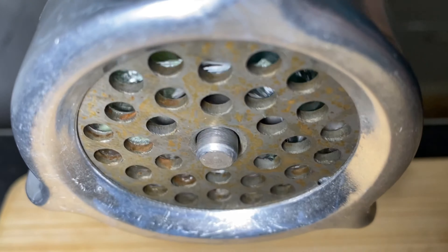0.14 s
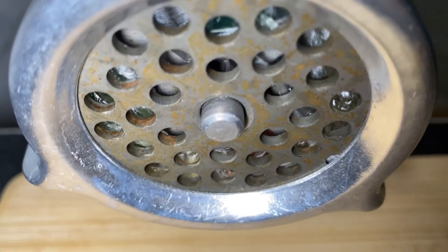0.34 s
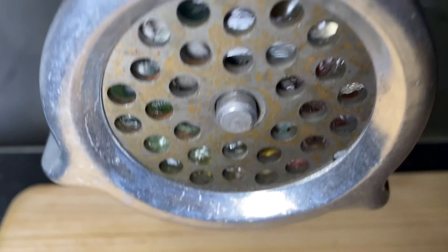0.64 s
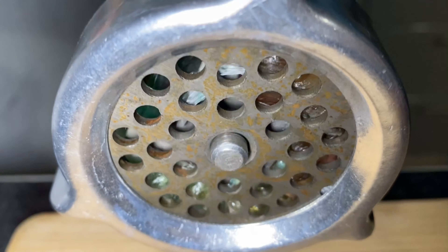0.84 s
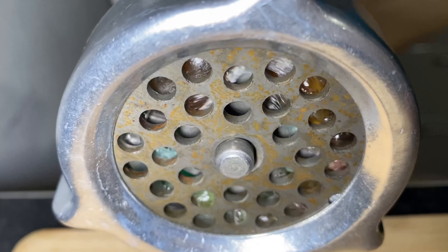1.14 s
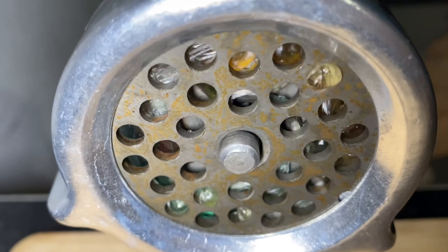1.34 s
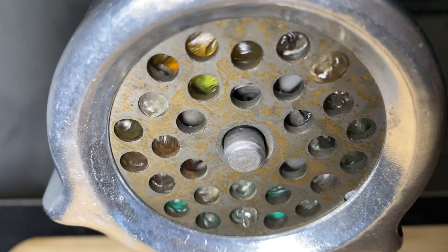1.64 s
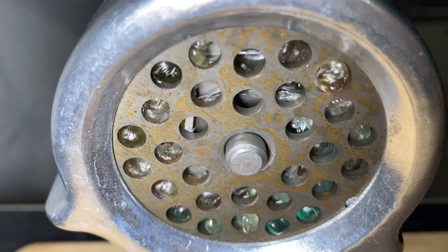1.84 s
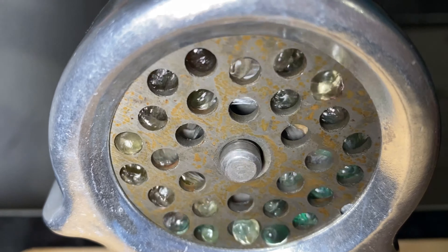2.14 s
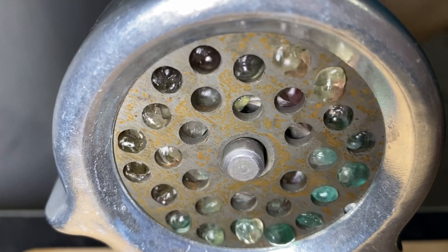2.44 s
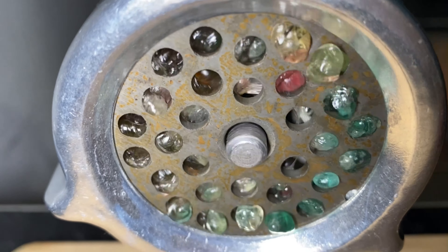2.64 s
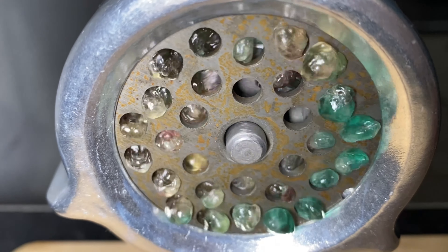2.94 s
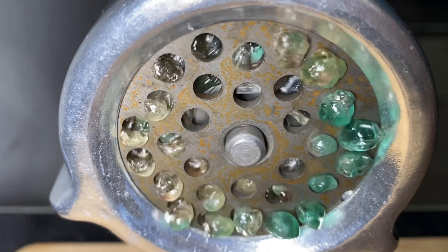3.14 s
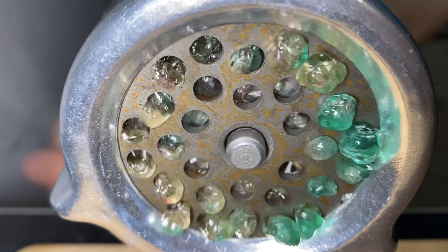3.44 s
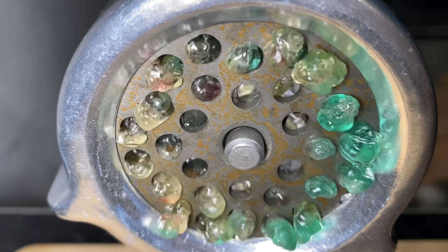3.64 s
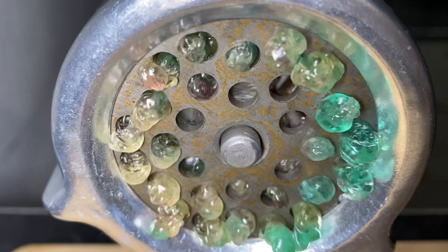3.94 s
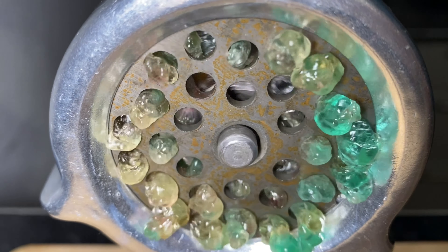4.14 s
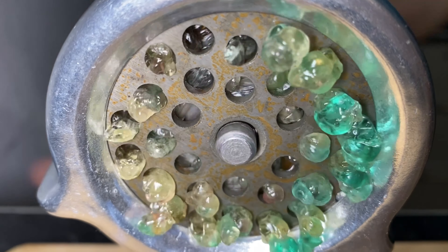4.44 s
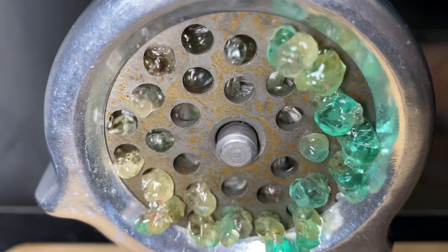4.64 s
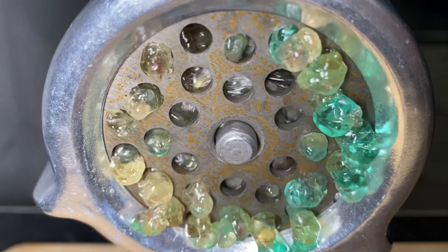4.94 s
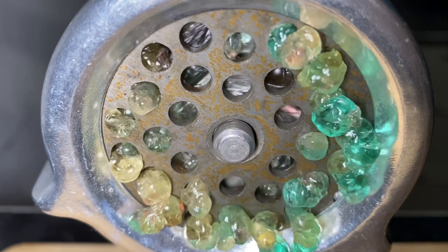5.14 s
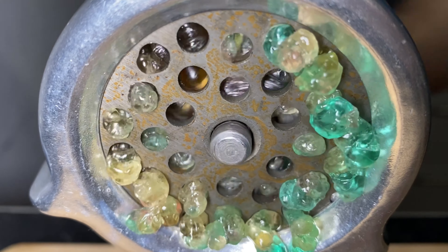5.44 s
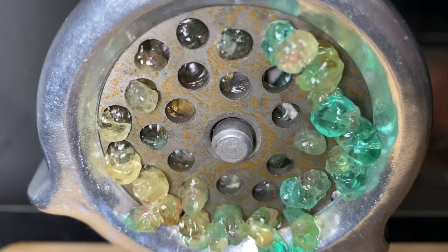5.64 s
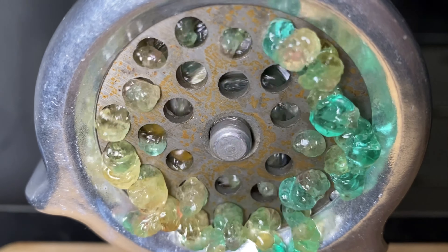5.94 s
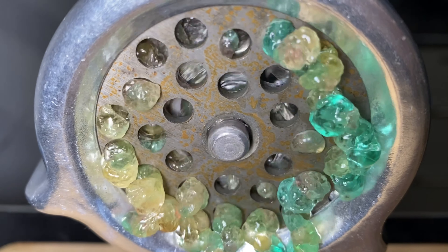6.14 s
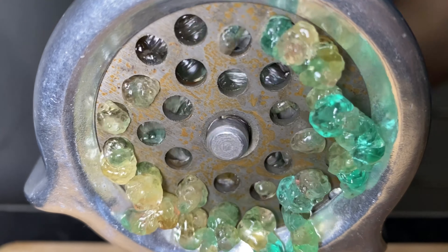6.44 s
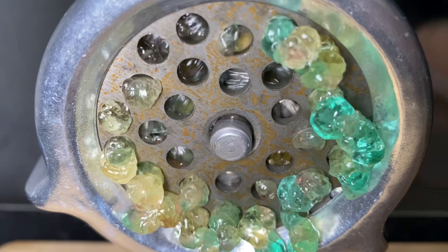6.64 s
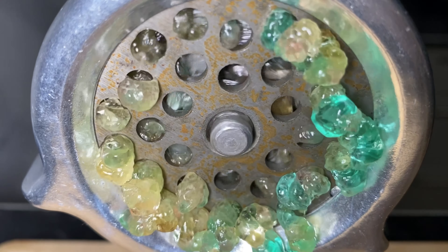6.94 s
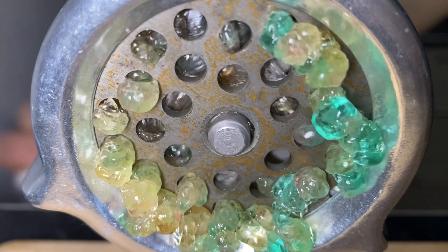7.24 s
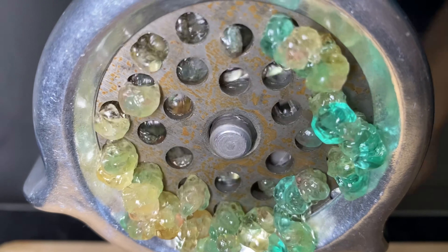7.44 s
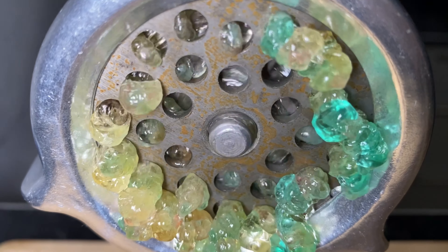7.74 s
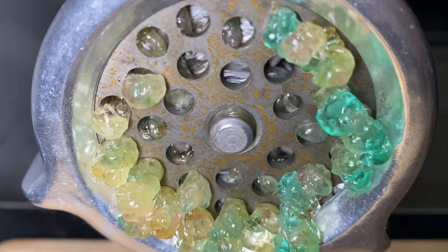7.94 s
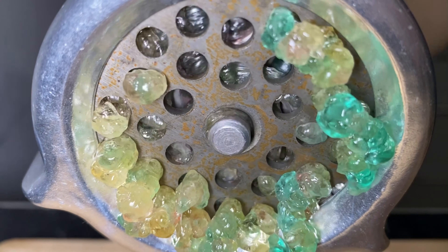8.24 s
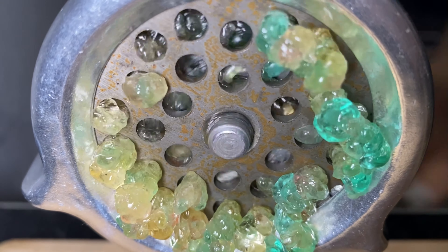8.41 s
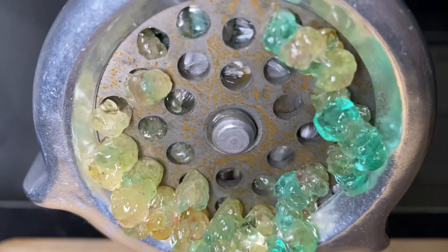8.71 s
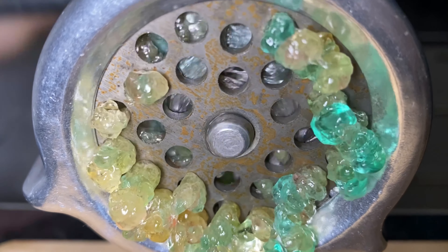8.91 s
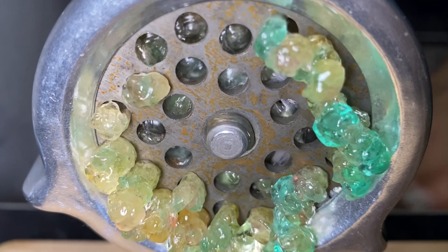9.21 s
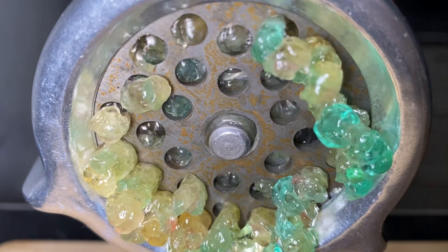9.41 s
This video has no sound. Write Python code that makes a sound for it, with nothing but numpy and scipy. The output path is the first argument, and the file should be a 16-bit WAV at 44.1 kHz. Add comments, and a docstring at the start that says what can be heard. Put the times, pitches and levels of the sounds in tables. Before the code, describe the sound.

An electric meat grinder runs for about ten seconds, heard close and fairly dry in a kitchen. Its low, wavering drone and rumble swell and ease roughly once a second as the screw pushes soft candy through the holed plate. Wet churning, sticky fizz and small irregular pops and ticks continue throughout. A short crunch comes at 1.4 seconds, and the drone swells around 2.4, with dull knocks. A loud pop at 3.2 is followed by sharp cracks with a brief metallic clink at 3.7 and 3.8. Crunching, knocks, faint squeaks and a stronger drone fill 4.1 to 4.7. More pops and a gritty rub come around 6.2 to 6.6, then loud snapping pops at 7.9 and 8.4. The sharpest crack hits at 9.2, briefly ringing the metal head, while the grinder keeps churning.

```python
"""Candy through a meat grinder

An electric grinder in a kitchen, close to a two-port microphone, presses soft candy through its plate.
Each push of the auger loads the body, which drones at one resonance over a rumble; the sticky mass
churns and fizzes. Air pockets pop in the holes, and now and then a hard piece cracks on the metal head."""
import sys
import numpy as np
from scipy import signal
from scipy.fft import rfft, irfft, next_fast_len
from scipy.io import wavfile

SR = 44100
rng = np.random.default_rng(int(sys.argv[2]) if len(sys.argv) > 2 else 0)


def put_to_file(sound):
    """Save the sound as 16-bit audio at rate SR, in the file named by the first command-line argument."""
    columns = np.atleast_2d(sound).T  # one column per channel
    safe = np.clip(columns, -1, 1)
    whole_steps = np.round(safe * 32767)
    wavfile.write(sys.argv[1], SR, whole_steps.astype(np.int16))


N = 422037

def from_db(db):
    return 10 ** (np.asarray(db) / 20)

def rms_one(x):
    return x / np.sqrt(np.mean(x ** 2) + 1e-20)

def energy_one(x):
    return x / np.sqrt(np.sum(x ** 2) + 1e-20)

def bins(size):
    return np.arange(size // 2 + 1) * SR / size

def at_hz(points, hz):
    """A curve read on a log-frequency axis."""
    f, value = np.transpose(points)
    return np.interp(np.log(np.maximum(hz, 1)), np.log(f), value)

def sides(pan_db):
    """Left and right gains, the left louder by pan_db."""
    return from_db([[pan_db / 2], [-pan_db / 2]])

def add(out, s, sound, pan_db):
    """Place a short sound at its time and side."""
    at = round(s * SR)
    sound = sound[:N - at]
    out[:, at:at + len(sound)] += rms_one(sides(pan_db)) * sound

def drift(hz):
    """A smooth random wander with spread 1."""
    step, settle = 40, 2000
    r = np.exp(-2 * np.pi * hz * step / SR)
    slow = signal.lfilter([1], [1, -2 * r, r * r], rng.standard_normal(N // step + settle + 2))[settle:]
    return np.interp(np.arange(N) / step, np.arange(len(slow)), rms_one(slow))

def swell(peak_s, length_s):
    """A rounded swell of height 1."""
    out, at, half = np.zeros(N + SR), round(peak_s * SR), int(length_s * SR / 2)
    span = np.arange(max(at - half, 0), at + half)
    out[span] = np.cos(np.pi / 2 * (span - at) / half) ** 2
    return out[:N]

def resonate(x, hz, width_hz):
    """Two passes through a two-pole resonance; rms 1."""
    r = np.exp(-np.pi * width_hz / SR)
    b, a = np.array([1, 0, -1]) * (1 - r * r) / 2, [1, -2 * r * np.cos(2 * np.pi * hz / SR), r * r]
    return rms_one(signal.lfilter(b, a, signal.lfilter(b, a, x)))

def band_noise(shape, hz, width_hz):
    return resonate(rng.standard_normal(shape), hz, width_hz)

def blip(hz, cycles):
    """A heavily damped ring that builds up and dies within a few cycles; energy 1."""
    t = np.arange(1024) / SR
    return energy_one(t ** 2 * np.exp(-t * hz / cycles) * np.sin(2 * np.pi * hz * t))

def impulse(spectrum, tilt_db=0, ripple_db=2, knee_hz=1500, size=1024):
    """The tightest causal click with this spectrum, tilted above the knee and randomly rippled."""
    hz = np.maximum(bins(size), 100)
    ripple = np.interp(hz, np.linspace(0, SR / 2, 60), rng.standard_normal(60))
    shape_db = at_hz(spectrum, hz) + tilt_db * np.log2(np.maximum(hz / knee_hz, 1)) + ripple_db * ripple
    cepstrum = irfft(np.log(from_db(shape_db)))
    causal = 2 * cepstrum * (np.arange(size) < size // 2)
    return energy_one(irfft(np.exp(rfft(causal))))

def smear(click, scatter, decay_s):
    """A break runs on as a swelling, then dying train of smaller breaks; the energy stays."""
    age = np.arange(len(click)) / (decay_s * SR)
    train = scatter * rng.standard_normal(len(click)) * age * np.exp(1 - age)
    train[0] = 1
    return energy_one(signal.fftconvolve(click, train)[:len(click)]) * np.sqrt(np.sum(click ** 2))

def grains(per_s, spread_db, smooth):
    """Two streams of tiny ruptures of uneven size over a smooth hiss."""
    sizes = from_db(spread_db * np.minimum(rng.exponential(1, (2, N)), 4)) * rng.choice([-1, 1], (2, N))
    return rms_one(sizes * (rng.random((2, N)) < per_s / SR)) + smooth * rng.standard_normal((2, N))

def plate(x, ring_db, ring_s):
    """Whatever rubs on the plate is coloured by its many narrow resonances."""
    t = np.arange(SR // 10) / SR
    response = from_db(ring_db) * energy_one(rng.standard_normal(len(t)) * np.exp(-t / ring_s))
    response[0] += 1
    return signal.fftconvolve(x, energy_one(response)[None], axes=1)[:, :N]

# Diffuse sound at the microphone. Each row: frequency in Hz, likeness of the two ports from 0 to 1.
PORT_LIKENESS = [(40, .92), (130, .75), (260, .75), (600, .4), (1000, .25), (2400, .2), (4500, .55),
                 (8000, .85), (16000, .8)]
def texture(source, spectrum, patchy_db, flutter_hz):
    """Two noises spread over both ports, in half-octave bands that flicker partly together."""
    size = next_fast_len(N, True)
    hz, (mid, side) = bins(size), rfft(source, size)
    alike = at_hz(PORT_LIKENESS, hz)
    pair = np.sqrt(1 + alike) * mid + np.sqrt(1 - alike) * side * [[1], [-1]]
    pair *= from_db(at_hz(spectrum, hz))
    half_octaves = 2 * np.log2(np.maximum(hz, 1) / spectrum[0][0])
    out, together = 0, drift(flutter_hz)
    for k in range(int(2 * np.log2(spectrum[-1][0] / spectrum[0][0])) + 2):
        band = irfft(pair * np.maximum(1 - abs(half_octaves - k), 0), size)[:, :N]
        out = out + band * from_db(patchy_db * (together + drift(flutter_hz)) / np.sqrt(2))
    return rms_one(out)

# Room tone in the kitchen. Each row: frequency in Hz, relative density in dB.
ROOM_TONE = [(30, -20), (44, 3.5), (70, -6), (110, -5.5), (180, -8.5), (400, -22)]
def room_tone(level_db=-58):
    """A steady deep background, heard between the pushes."""
    return from_db(level_db) * texture(rng.standard_normal((2, N)), ROOM_TONE, 2, flutter_hz=4.7)

# The motor, under the rumble. Each row: frequency in Hz, level in dB.
MOTOR = [(76, -63.5), (126, -66.5)]
def motor(waver_hz=1.34, flutter_db=1.5):
    """A low hum that wanders in pitch and level."""
    out = 0
    for hz, db in MOTOR:
        gain = np.sqrt(2) * from_db(db + flutter_db * drift(1.4))
        out = out + gain * np.sin(2 * np.pi * np.cumsum(hz + waver_hz * drift(2.9)) / SR)
    return out

# The auger's pushes. Each row: start and end in seconds, then the drive in dB of drone, rumble,
# housing, churn, fizz and grit. SLACK_DB holds the same six between pushes.
PUSHES = [(-0.12, 0.707, -37, -49.5, -57.5, -61, -65.5, -64),
          (0.62, 1.75, -41.5, -47, -55.5, -59.5, -67, -87),
          (1.681, 2.177, -42.5, -46.5, -56, -66, -65.5, -75),
          (2.106, 2.924, -42, -40, -50, -57.5, -61.5, -53.5),
          (2.857, 3.935, -40, -46.5, -51, -59.5, -69, -62.5),
          (3.947, 4.836, -43.5, -41.5, -46.5, -55.5, -64.5, -55),
          (4.815, 5.58, -39, -45, -48.5, -59, -63.5, -61.5),
          (5.499, 5.803, -41.5, -49, -60, -62.5, -80, -63.5),
          (5.855, 6.881, -38, -45, -48.5, -57.5, -63, -61), (6.768, 7.384, -36, -43, -48.5, -57, -63, -65),
          (7.383, 7.682, -37, -45, -47, -57.5, -66.5, -72),
          (7.647, 8.311, -37, -43.5, -49.5, -59.5, -64, -67),
          (8.283, 9.194, -39, -43, -49.5, -60, -64.5, -59.5),
          (9.071, 9.44, -44.5, -48, -53, -59, -58.5, -56), (9.51, 9.903, -30, -41, -61, -52.5, -68, -69.5)]
SLACK_DB = [-43.5, -53, -62.5, -68, -71, -66.5]
def pushes(rise_s=0.099, fall_s=0.2, arch=0.21):
    """Each push builds, arches and lets go; gives the six drives in dB."""
    t, slack = np.arange(N) / SR, np.array(SLACK_DB)[:, None]
    levels = slack + np.zeros(N)
    for start, end, *peak_db in PUSHES:
        on = (t > start) & (t < end)
        age, length = t[on] - start, end - start
        grip = np.clip(np.minimum(age / rise_s, (length - age) / fall_s), 0, 1)
        effort = grip * (1 - arch + arch * np.sin(np.pi * age / length))
        levels[:, on] = np.maximum(levels[:, on], slack + (np.array(peak_db)[:, None] - slack) * effort)
    return levels

# Swells of the beating drone. Each row: peak time and length in seconds, pitch in Hz, level in dB.
DRONE_SWELLS = [(0.285, 0.11, 256.3, -41.5), (0.525, 0.25, 259.5, -38.5), (0.693, 0.056, 250.1, -40),
                (0.783, 0.15, 257.8, -39.5), (0.895, 0.19, 258.7, -39.5), (1.162, 0.077, 250.1, -37.5),
                (1.289, 0.27, 256.1, -39), (1.495, 0.4, 259.1, -41.5), (1.869, 0.2, 257.0, -41.5),
                (2.113, 0.25, 259.0, -39), (2.284, 0.14, 252.1, -35.0), (2.375, 0.22, 258.2, -29),
                (2.474, 0.075, 256.3, -35.0), (2.6, 0.32, 256.9, -36.5), (2.75, 0.083, 256.2, -41.5),
                (2.986, 0.091, 253.8, -37.5), (3.047, 0.069, 258.9, -38), (3.145, 0.19, 260.0, -37.0),
                (3.271, 0.2, 258.0, -33), (3.421, 0.21, 257.9, -32.5), (3.624, 0.21, 254.5, -39.5),
                (3.754, 0.22, 257.3, -41.0), (4.113, 0.2, 257.4, -36), (4.323, 0.26, 259.6, -29.0),
                (4.458, 0.22, 256.6, -30.5), (4.577, 0.16, 255.6, -43), (5.105, 0.43, 256.5, -36),
                (5.379, 0.29, 257.4, -39), (6.006, 0.083, 251.1, -34.5), (6.118, 0.42, 255.2, -39.5),
                (6.364, 0.45, 259.7, -29.5), (6.7, 0.46, 258.2, -42.5), (6.949, 0.14, 253.1, -42.5),
                (7.146, 0.22, 258.2, -36), (7.648, 0.12, 257.3, -41), (7.775, 0.087, 254.4, -33.5),
                (7.882, 0.37, 254.7, -40), (8.01, 0.29, 256.1, -36.5), (8.1, 0.17, 256.9, -36.5),
                (8.595, 0.3, 258.7, -41.0), (8.752, 0.042, 248.7, -40), (8.85, 0.21, 256.0, -34.0),
                (9.175, 0.23, 256.4, -46), (9.342, 0.26, 257.1, -40)]
def drone(drive_db, rest_hz=262.2, waver_hz=2.15, throb_db=2.5, stutter_db=1.3, rough=0.22):
    """Friction keeps the body's main resonance swinging; it beats, swelling and wavering in pitch."""
    power = from_db(drive_db - 12 + throb_db * drift(7)) ** 2
    weighted_hz = rest_hz * power
    for s, length_s, hz, db in DRONE_SWELLS:
        swell_power = (from_db(db) * swell(s, length_s)) ** 2
        power, weighted_hz = power + swell_power, weighted_hz + hz * swell_power
    pitch_hz = weighted_hz / power + waver_hz * drift(9.3)
    tone = np.sqrt(2) * np.sin(2 * np.pi * np.cumsum(pitch_hz) / SR)
    friction = rough * band_noise((2, N), 257.7, width_hz=45)
    return from_db(stutter_db * drift(14.6)) * np.sqrt(power) * (tone * sides(-0.5) + friction)

# The grinder's body from close by. Each row: frequency in Hz, relative density in dB.
RUMBLE = [(25, -32.5), (33, -15), (42, -11), (75, -7), (95, -9), (125, 1.5), (150, -0.5), (185, -5.5),
          (225, 3.5), (300, -17), (450, -23.5)]
def rumble(level_db, thud):
    """The kneading screw shakes the body, harder at each knock."""
    noise = texture(rng.standard_normal((2, N)), RUMBLE, patchy_db=2, flutter_hz=22)
    return np.hypot(from_db(level_db), thud) * noise * sides(-1.6)

# The housing's weaker resonances. Each row: frequency and width in Hz, relative level in dB.
HOUSING = [(366.6, 6.9, -5), (446.2, 9.8, -9), (493, 26, -9.5), (616.3, 29.5, -3), (826, 17, -16),
           (886, 17, -9), (989, 13, -19.5), (1193, 52, -16.5)]
def housing(level_db, clunk):
    """Kneading and knocks stir the housing's resonances."""
    ring = 0
    for hz, width, db in HOUSING:
        gain = from_db(db + 1.9 * drift(18))
        centre, diffuse = band_noise(N, hz, 2 * width), band_noise((2, N), hz, 2 * width)
        ring = ring + gain * (centre + 0.75 * diffuse)
    return rms_one(ring) * np.hypot(from_db(level_db), clunk * from_db(1.5))

# The wet mass in the barrel. Each row: frequency in Hz, relative density in dB.
CHURN = [(250, 8.5), (400, 2.5), (620, 7.5), (1000, -4.5), (1350, 1.5), (2100, -3.5), (3200, -7.5),
         (5000, -24), (9000, -48)]
def churn(level_db):
    """The screw turns the wet mass over against the plate."""
    ruptures = plate(grains(per_s=260, spread_db=3, smooth=0.48), ring_db=0, ring_s=0.013)
    return from_db(level_db) * texture(ruptures, CHURN, patchy_db=2, flutter_hz=14.3)

# Rubbing at the plate. Each row: frequency in Hz, relative density in dB.
GRIT = [(1200, 4), (2000, 5.5), (2800, 0), (3600, -10.5), (4400, -4), (5500, -4.5), (7000, -15.5),
        (9000, -31.5)]
def grit(level_db, rub):
    """Candy rubs grittily on the plate."""
    ruptures = plate(grains(per_s=380, spread_db=3, smooth=0.64), ring_db=1.5, ring_s=0.0042)
    return np.hypot(from_db(level_db), rub) * texture(ruptures, GRIT, patchy_db=2.5, flutter_hz=29)

# Sticky fizz, close up. Each row: frequency in Hz, relative density in dB.
FIZZ = [(2500, -17), (4200, -11), (5800, -1.5), (7600, 1), (9500, -4), (12000, -8.5), (16000, -17)]
def fizz(level_db, sizzle):
    """Dense tiny ruptures in the sticky mass blend into a hiss."""
    ruptures = plate(grains(per_s=1200, spread_db=4, smooth=2.2), ring_db=-3.5, ring_s=0.0035)
    return np.hypot(from_db(level_db), sizzle) * texture(ruptures, FIZZ, patchy_db=2.5, flutter_hz=50)

def squelches(churn_db, per_s=40, centre_hz=1300, length_s=0.015):
    """Small slips inside the mass each ring one random pocket, as loud as the churning allows."""
    out = np.zeros((2, N))
    moments = np.flatnonzero(rng.random(N - 1) < per_s / SR)
    for at, (octaves, stretch, pan_db) in zip(moments, rng.normal(0, [.38, .35, 2], (len(moments), 3))):
        hz, size = centre_hz * 2 ** octaves, int(length_s * SR * np.exp(stretch))
        slip = band_noise(size, hz, 0.32 * hz) * np.sin(np.linspace(0, np.pi, size))
        add(out, at / SR, from_db(churn_db[at] + 1.5) * slip, pan_db)
    return out

# A thread or film of candy snapping. Each row: frequency in Hz, relative density in dB.
SNAP = [(500, -8.5), (1200, -30), (2500, 0.5), (3600, -7.5), (5500, -1), (8300, -11), (10500, -8.5),
        (12500, -33), (16000, -26)]
def crackle(drive_db, per_s=28, level_db=-37, spread_db=1.5, follow=0.61):
    """Sticky threads part at random with tiny ticks, louder as the drive rises."""
    out, swing_db = np.zeros((2, N)), follow * (drive_db - drive_db.mean())
    moments = np.flatnonzero(rng.random(N - 1) < per_s / SR)
    for at, weakness in zip(moments, np.minimum(rng.exponential(1, len(moments)), 2)):
        tick = impulse(SNAP, tilt_db=rng.normal(1, 1.5), ripple_db=5)
        add(out, at / SR, from_db(level_db - spread_db * weakness + swing_db[at]) * tick, pan_db=2)
    return out

# A pocket's spray and its puff of air. Each row: frequency in Hz, relative density in dB.
SPRAY = [(6000, -30), (10000, -12), (12000, -2), (14500, 0), (16000, -5), (18000, -18)]
PUFF = [(40, -30), (200, 1.5), (500, 11), (1000, 8), (2500, -20), (6000, -59), (16000, -58.5)]
def pop(hz, cavity_db, snap_hz, snap_db, spray_db):
    """A film of candy snaps, letting out spray and air; the pocket rings with a weak overtone."""
    cavity = blip(hz, cycles=1.1) + from_db(-17) * blip(hz * 1.395, cycles=2.2)
    ring = from_db(cavity_db) * cavity + from_db(snap_db - 4.5) * blip(snap_hz, cycles=0.97)
    # the harder the jet of spray, the more of the snap is a broad click
    click = from_db(min(snap_db - 4, spray_db + 6)) * impulse(SNAP)
    spray = from_db(spray_db) * impulse(SPRAY)
    puff = from_db(spray_db - 11) * impulse(PUFF, ripple_db=1)
    return ring + smear(click, scatter=1, decay_s=6e-5) + smear(spray, scatter=0.34, decay_s=1e-4) + puff

# Bursts at the plate, a little left of the microphone. Each row: start in seconds, cavity pitch in Hz, # cavity
# strength in dB, snap pitch in Hz, snap strength in dB, spray strength in dB. MORE_POCKETS holds # further
# bursts of the same kind, with the same columns.
AIR_POCKETS = [(0.12, 4500, -24, 1960, -22, -23.5), (0.7132, 2100, -9.5, 4430, -11, -35),
               (0.7416, 9200, -23.5, 6500, -24, -26), (1.0553, 10100, -13.5, 7300, -19.5, -22),
               (1.149, 10300, -25, 7300, -28, -28), (1.391, 9030, -30, 2770, -25, -27),
               (1.613, 7360, -23, 5150, -23, -26), (1.805, 2090, -10, 3220, -22.5, -29),
               (2.513, 6980, -19, 4690, -17, -29), (2.7851, 6820, -25, 4500, -25, -53),
               (2.8303, 7170, -15.5, 4300, -21, -28), (2.868, 4400, -27, 5800, -28, -37),
               (2.9534, 5130, -19.5, 3430, -16.5, -35), (2.99, 8750, -20, 5400, -31, -31),
               (3.02, 8250, -21, 5187, -21.5, -42), (3.1044, 8300, -18.5, 3000, -16.5, -30),
               (3.1146, 3470, -24, 4830, -21, -45), (3.1397, 2500, -30, 5480, -27, -36),
               (3.2255, 4380, 6, 3170, 2.5, -21), (3.2253, 5160, 2, 2300, -15, -32),
               (3.553, 6100, -10, 7740, -19, -35), (3.555, 6200, -18, 7000, -27, -38),
               (3.6137, 7100, -21, 9170, -20, -33), (3.694, 3200, -7.5, 1900, -10, -15),
               (3.9234, 1850, -30, 6930, -22, -28), (4.214, 2830, -24, 4940, -21, -29),
               (4.5476, 5250, -22.5, 3050, -22, -44), (4.915, 918, -25, 6900, -20, -7),
               (4.9906, 7400, -21.5, 9250, -20, -38), (5.3367, 9330, -30, 3760, -25.5, -20.5),
               (5.8417, 8970, -17.5, 5610, -19, -27), (5.859, 10100, -22, 7660, -22, -23),
               (6.091, 4900, -26.5, 2910, -22.5, -31), (6.2109, 6150, -5, 7700, -8, -16.5),
               (6.2972, 2030, -2.5, 2840, -14, -34.5), (6.3923, 7370, -18.5, 1987, -24, -29),
               (6.4288, 1900, -18.5, 3000, -18.5, -40), (6.49, 5600, -33, 10560, -16, -24),
               (6.6836, 8950, -20, 2780, -16, -21), (6.8011, 10370, -20, 7350, -24.5, -24),
               (6.8584, 2000, -18.5, 2068, -19, -48), (6.9866, 9700, -17, 7650, -16.5, -13),
               (7.11, 10600, -14, 7860, -19.5, -20), (7.3594, 6830, -19, 5140, -22.5, -18),
               (7.486, 2470, -30, 1380, -14, -44), (7.4971, 1920, -12, 2830, -43, -48),
               (7.636, 7470, -17, 2840, -36, -25), (7.6379, 7200, -23, 5600, -19, -27),
               (7.784, 1780, -13, 2880, -38, -48), (7.9392, 2710, 1, 6680, -1, -6),
               (8.1583, 8380, -21.5, 10100, -44.5, -28.5), (8.4378, 8580, -2.5, 2640, -7, -11),
               (8.4386, 4430, -1.5, 8840, 0.5, -1.5), (8.5805, 4440, -9, 7560, -8, -13.5),
               (8.7301, 1850, -21, 9000, -23, -30), (8.815, 3130, -21, 4550, -16.5, -26.5),
               (8.865, 3150, -20, 1800, -19, -32), (9.3072, 2872, -21, 5310, -20, -19),
               (9.393, 8340, -17, 5460, -19, -26.5)]
MORE_POCKETS = [(0.268, 9500, -38, 5200, -44, -38), (0.282, 10000, -38, 6000, -42, -33),
                (0.639, 10500, -38, 7000, -33, -40), (0.5382, 2400, -24, 6960, -34.5, -38),
                (1.003, 4300, -28.5, 7600, -40, -40), (1.8903, 7000, -24.5, 3700, -44, -25),
                (2.099, 2000, -22, 3020, -40, -50), (2.4995, 7520, -39, 4210, -32, -29),
                (2.587, 4340, -37, 6030, -35, -48), (2.599, 4300, -27.5, 5700, -29, -48),
                (2.623, 5070, -27, 4200, -28, -48), (2.7258, 8300, -28, 2920, -30, -41.5),
                (2.877, 3940, -31, 5900, -27, -40), (2.938, 2698, -22.5, 6900, -28, -33),
                (3.303, 7000, -30, 3500, -38, -37), (3.403, 2960, -32, 5860, -30, -47),
                (3.4207, 7300, -29, 2300, -22, -35), (3.6441, 4670, -17, 5500, -15, -40),
                (3.7754, 3080, -30, 5830, -27, -41), (3.8943, 5340, -24.5, 5000, -24, -54),
                (4.0096, 2940, -25.5, 2600, -36, -55), (4.055, 4630, -34, 6030, -24, -50),
                (4.0837, 2400, -21.5, 6890, -31, -54), (4.1782, 7800, -28, 3230, -30, -37),
                (4.6081, 3300, -28, 6700, -27.5, -45), (4.869, 3080, -27, 5440, -28, -46),
                (4.9112, 5960, -30, 3460, -21, -21), (4.959, 6700, -29.5, 3390, -32, -42),
                (5.365, 3300, -35.5, 5500, -37, -33), (5.399, 7930, -40.5, 4260, -29, -26),
                (5.8096, 6640, -31, 3280, -30, -39), (5.8235, 6920, -26.5, 4450, -29, -40),
                (5.9063, 4060, -25, 6300, -31, -41), (5.9135, 8050, -34, 1900, -28, -31),
                (6.2498, 5740, -21.5, 4600, -23, -49), (6.2782, 6000, -27, 3880, -23, -42),
                (6.5485, 7190, -29.5, 2200, -24, -35), (6.7494, 6370, -34.5, 4093, -37, -34),
                (6.9063, 7830, -36, 3390, -28.5, -23), (6.9701, 4070, -28.5, 6690, -37, -50),
                (7.154, 2900, -35.5, 3200, -40.5, -57.5), (7.7737, 5340, -25, 4765, -32, -53.5),
                (7.7955, 7450, -26.5, 1783, -29, -51), (7.9069, 6900, -27, 2090, -24.5, -31.5),
                (7.9576, 2908, -26.5, 5610, -29, -34), (8.0522, 7500, -22, 3540, -27.5, -38),
                (8.1732, 7610, -25, 3700, -41, -43), (8.2965, 10500, -40, 7000, -45, -27),
                (8.3604, 3400, -36, 5700, -25, -31), (8.5111, 3730, -30, 5670, -40, -50),
                (8.5635, 3980, -28, 5810, -42, -46), (8.7147, 5802, -21.5, 5014, -30, -33),
                (8.8384, 3500, -28, 7640, -24, -44), (8.9218, 2600, -36, 8700, -33, -29.5),
                (9.1532, 7900, -31, 4200, -40, -28.5), (9.3806, 7600, -33, 10500, -38, -38),
                (9.4174, 3057, -27, 7520, -35.5, -34.5), (9.488, 8120, -36.5, 4050, -31, -35)]
def pops():
    """Air pockets burst in the holes of the plate."""
    out = np.zeros((2, N))
    for s, *pocket in AIR_POCKETS + MORE_POCKETS:
        add(out, s, pop(*pocket), pan_db=3)
    return out

# Brittle lumps in the barrel, and splinters flying off the hard pieces that crack on the head. Each row: #
# start and decay in seconds, centre pitch in Hz, energy in dB.
CRUNCHES = [(0.225, 0.0051, 1500, -27), (0.388, 0.01, 880, -27), (0.714, 0.0014, 1630, -21),
            (1.403, 0.034, 980, -13.5), (1.488, 0.01, 1680, -27), (1.525, 0.015, 990, -25),
            (1.803, 0.005, 1310, -18), (2.44, 0.013, 1250, -23.5), (2.626, 0.0083, 2200, -23),
            (3.695, 0.002, 500, -15), (3.705, 0.0031, 1120, -9), (4.173, 0.01, 980, -19),
            (4.252, 0.022, 1190, -16), (4.4, 0.024, 1210, -13), (4.427, 0.012, 1100, -12.5),
            (4.628, 0.012, 940, -13.5), (4.685, 0.0043, 1370, -21.5), (5.066, 0.0022, 2090, -27),
            (5.646, 0.007, 1310, -29.5), (6.297, 0.0029, 1050, -10.5), (6.842, 0.0088, 1448, -20),
            (7.785, 0.0097, 1364, -18.5), (8.049, 0.0058, 765, -17), (8.1, 0.008, 1460, -24),
            (8.309, 0.0095, 3095, -34), (8.475, 0.0086, 1572, -17.5), (8.73, 0.019, 1380, -18),
            (8.868, 0.0099, 1930, -16.5), (8.945, 0.0068, 1720, -26), (9.2295, 0.0035, 6900, 0),
            (9.235, 0.03, 4300, -23)]
def crunches(breaks_per_s=1300, spread_octaves=0.49):
    """A lump or piece gives way and crumbles in a dying run of small breaks, each with its own pitch."""
    out = np.zeros((2, N))
    for s, decay_s, hz, energy_db in CRUNCHES:
        run, age_s = np.zeros((2, SR // 4)), 0
        for wait, octaves, size in rng.standard_normal((60, 3)):
            if age_s < 5 * decay_s:
                chip = blip(hz * 2 ** (spread_octaves * octaves), cycles=0.65)
                add(run, age_s, size * np.exp(-age_s / decay_s) * chip, pan_db=0)
            age_s += wait ** 2 / breaks_per_s
        add(out, s, from_db(energy_db) * energy_one(run[0]), pan_db=2)
    return out

# Candy dragging over the plate. Each row: start and length in seconds, pitch in Hz, level in dB.
RASPS = [(0.396, 0.3, 2780, -61.5), (0.42, 0.15, 1860, -55), (0.796, 0.47, 2780, -61),
         (1.231, 0.021, 1120, -49), (1.419, 0.099, 1300, -53), (1.724, 0.16, 1830, -51.5),
         (1.885, 0.33, 1840, -64), (2.272, 0.053, 1330, -47.5), (2.428, 0.04, 1290, -44),
         (2.616, 0.069, 2210, -50.5), (4.23, 0.077, 1400, -54), (4.388, 0.087, 1620, -51),
         (4.5, 0.07, 1800, -48.5), (6.226, 0.42, 1800, -53), (6.3, 0.22, 1200, -52),
         (6.557, 0.14, 1330, -49.5), (7.707, 0.12, 1710, -50.5), (8.018, 0.022, 1274, -51),
         (8.226, 0.083, 1500, -51), (8.528, 0.03, 1700, -48), (8.613, 0.067, 1560, -46),
         (9.203, 0.019, 5170, -39)]
def rasps(slips_per_s=600):
    """Sticky candy slips in quick uneven jerks, ringing the hole that it passes through."""
    out = np.zeros((2, N))
    for s, length_s, hz, db in RASPS:
        size = int(length_s * SR)
        slips = rng.standard_normal(size) * (0.36 + (rng.random(size) < slips_per_s / SR))
        rub = resonate(slips, hz, 0.34 * hz) * np.sin(np.linspace(0, np.pi, size))
        add(out, s, from_db(db) * rub, pan_db=-1)
    return out

# The screw loses its grip. Each row: centre and length in seconds, body and wet-sound change in dB.
LULLS = [(0.68, 0.22, -1, 3.5), (1.697, 0.14, -1, -1), (2.039, 0.14, -0.5, -7), (2.82, 0.16, -3.5, -3.5),
         (3.889, 0.2, -3, 1), (4.807, 0.21, -4, -8), (5.535, 0.69, 0, -3.5), (5.735, 0.11, -2, 2),
         (6.799, 0.17, -3, -2), (7.419, 0.081, -5, 5.5), (7.586, 0.077, -11.5, -0.5), (7.72, 0.038, -5, -1),
         (8.192, 0.08, -4, -5), (8.692, 0.086, -1, -1), (9.072, 0.08, -3.5, -1)]
def lulls():
    """Gains of the body and of the wet sounds while the screw runs slack."""
    return from_db(sum(np.array(db)[:, None] * swell(s, length_s) for s, length_s, *db in LULLS))

# The cast head with its plate, and the knife. Each row: frequency and width in Hz, relative level
# in dB, seconds to fall by 60 dB.
HEAD = [(438, 360, 4.5, 0.06), (1192, 97, 8, 0.24), (2100, 750, -11, 0.1), (2800, 270, -2, 0.36),
        (4460, 920, -0.5, 0.33), (5500, 830, -5, 0.24), (6700, 1450, 6, 0.21), (8400, 4640, 11.5, 0.12)]
KNIFE = [(1232, 79, 1, 0.049), (1900, 810, -8, 0.05), (2300, 250, -17, 0.045), (3120, 330, -6.5, 0.045),
         (4100, 320, -12, 0.059), (6170, 600, -8, 0.069), (6900, 530, -9.5, 0.059), (8500, 900, -25, 0.044)]
def metal_ring(modes, tilt_db=0, knee_hz=1192):
    """Crowded metal modes dying away; a dull blow stirs mainly the low ones."""
    t, out = np.arange(SR // 2) / SR, 0
    for hz, width, db, t60 in modes:
        start_db = db + tilt_db * max(np.log2(hz / knee_hz), 0)
        out = out + from_db(start_db - 60 * t / t60) * band_noise(len(t), hz, width)
    return out

# A hard piece shattering. Each row: frequency in Hz, relative density in dB.
SHATTER = [(100, -10.5), (400, -18), (650, -5.5), (1150, -1.5), (1700, -0.5), (2400, 6), (3500, -5.5),
           (5000, -3.5), (6600, 0), (8500, -2.5), (11000, -10.5), (16000, -15)]
# Breaks against the head. Each row: start in seconds, strength in dB, tilt in dB per octave, pitch of
# the piece in Hz, then head ring, knife ring and left minus right in dB.
CRACKS = [(0.714, -18.5, 3.5, 1990, -81, -45, 3), (3.6533, 4, -5, 2060, -41.5, -29, 3),
          (3.7904, 0, -10, 2320, -46, -31.5, 2), (7.487, -18.5, -15, 2550, -48.5, -53, 4),
          (8.3084, -7, -6.5, 1205, -45.5, -37.5, 3.5), (9.2171, 9, -1, 2190, -34.5, -38, 2),
          (9.2252, -1, 1.5, 8500, -58, -50, 2), (9.2296, -11, -2, 623, -44, -48, -6)]
def cracks(rebound_s=0.0051):
    """A hard piece shatters and sets the head ringing; the knife springs back with a clink."""
    out = np.zeros((2, N))
    for s, db, tilt_db, piece_hz, head_db, knife_db, pan_db in CRACKS:
        burst = smear(impulse(SHATTER, tilt_db, ripple_db=1), scatter=0.4, decay_s=0.0007)
        piece = from_db(-6) * blip(piece_hz, cycles=0.7)
        add(out, s, from_db(db) * (burst + piece), pan_db)
        add(out, s, from_db(head_db - 1) * metal_ring(HEAD, 0.91 * tilt_db), pan_db)
        add(out, s + rebound_s, from_db(knife_db) * metal_ring(KNIFE), pan_db)
    return out

# Escaping air. Each row: peak time and length in seconds, fizz and grit levels in dB.
SIZZLES = [(1.033, 0.44, -56, -58), (1.415, 0.29, -58.5, -62), (2.54, 0.26, -67, -60),
           (2.983, 0.25, -58, -59), (4.032, 0.11, -66, -49.5), (4.523, 0.09, -71.5, -57),
           (6.639, 0.093, -56, -60), (7.062, 0.17, -53.5, -48.5), (7.773, 0.13, -60.5, -60),
           (8.028, 0.048, -64, -55), (8.37, 0.081, -57, -64.5), (8.655, 0.13, -59, -70),
           (8.87, 0.061, -52, -56)]
def sizzles():
    """Trapped air sizzles out through the mass; gives gains for the fizz and the grit."""
    return sum(from_db(db)[:, None] * swell(s, length_s) for s, length_s, *db in SIZZLES)

# Dull knocks in the barrel. Each row: start in seconds, drive of rumble, housing and barrel note in dB.
KNOCKS = [(1.235, -58, -61, -62), (1.94, -33.5, -56, -60), (2.219, -42, -46, -48), (2.63, -40, -44, -59),
          (2.665, -36, -43, -53), (3.709, -36.5, -50, -55), (4.125, -50, -43, -47), (4.171, -54, -52, -41),
          (4.252, -43, -49.5, -40), (4.328, -45, -58, -48), (4.628, -41, -51, -52), (4.912, -38, -60, -66),
          (5.282, -40, -48, -60), (6.613, -33, -42.5, -66.5), (7.1, -42, -54, -58),
          (8.044, -37, -46.5, -45), (8.438, -49.5, -60.5, -59.5), (9.216, -34, -43, -42)]
def knocks(rise_s=0.011):
    """Lumps give way; gives three gains that swell quickly and die away."""
    gains, age = np.zeros((3, N)), np.arange(SR // 4) / (rise_s * SR)
    for s, *peak_db in KNOCKS:
        at = round(s * SR)
        gains[:, at:at + len(age)] += from_db(peak_db)[:, None] * age * np.exp(1 - age)
    return gains

# Squeaks in the holes. Each row: peak time and length in seconds, pitch in Hz, level in dB.
SQUEAKS = [(2.592, 0.044, 1790, -52), (4.272, 0.05, 1400, -48), (4.41, 0.12, 1782, -48)]
def squeaks(width_hz=45):
    """Candy sticks and slips evenly for a moment and gives a thin note."""
    return sum(from_db(db) * swell(s, length_s) * band_noise(N, hz, width_hz)
               for s, length_s, hz, db in SQUEAKS)

def kitchen(x, echo_db, early_db, tail_db, echo_s=0.0017, early_s=0.0062, t60_s=0.28, wall_hz=7000):
    """An echo off the worktop, scatter from nearby things and a short dull tail."""
    t = np.arange(SR // 2) / SR
    noise = rng.standard_normal((2, 2, len(t))) * (t > .003)
    early = np.array([energy_one(side * np.exp(-t / early_s)) for side in noise[0]])
    tail = np.array([energy_one(side * from_db(-60 * t / t60_s)) for side in noise[1]])
    response = from_db(early_db) * early + from_db(tail_db) * tail
    response[:, round(echo_s * SR)] += from_db(echo_db)
    response = signal.sosfilt(signal.butter(1, wall_hz, fs=SR, output="sos"), response)
    return x + signal.fftconvolve(x, response, axes=1)[:, :N]

def scene():
    """The body and the wet mass are close and dry; breaks and pops carry into the kitchen."""
    drone_db, rumble_db, housing_db, churn_db, fizz_db, grit_db = pushes()
    body_gain, wet_gain = lulls()
    thud, clunk, hollow = knocks()
    sizzle, rub = sizzles()
    lumps = drift(6.4)  # one unevenness shared by all the kneading sounds
    body = rumble(rumble_db - 0.76 + 1.47 * lumps, thud)
    body += housing(housing_db - 2 + 2.47 * lumps, clunk)
    wet = churn(churn_db + 3.5 + 2.4 * lumps)
    wet += grit(grit_db + 0.45 + 4.25 * lumps, rub)
    wet += fizz(fizz_db + 1.5 + 2.7 * lumps, sizzle)
    body += hollow * band_noise(N, 630.6, width_hz=42)  # the barrel's note
    close = room_tone() + motor() + body_gain * (drone(drone_db) + body) + wet_gain * wet * sides(1.4)
    hard = kitchen(cracks() + crunches(), echo_db=-11, early_db=-10.5, tail_db=-13.5)
    candy = pops() + squeaks() + plate(rasps() + squelches(churn_db), ring_db=-4, ring_s=0.011)
    candy += crackle(np.maximum(fizz_db, grit_db))
    return close + hard + kitchen(candy, echo_db=-60, early_db=-17, tail_db=-22.5)

# Timing at the microphone's ports. Each row: frequency in Hz, lead of the left in radians.
PORT_PHASE = [(130, 0), (260, 0.48), (550, 1.15), (900, 1.45), (1500, 1.95), (2200, 1.75), (3500, 0.8),
              (5000, .5), (7900, 0.4), (9000, -1.6), (10000, -3.1), (12300, -6), (14600, -9.4),
              (17000, -12.6)]
# Balance at the ports. Each row: frequency in Hz, left minus right in dB.
PORT_BALANCE = [(60, -2.5), (150, 3), (260, -1), (600, 1), (2500, -0.64), (5000, 2), (8000, -1),
                (16000, -2.5)]
def record(dry, low_cut_hz=37, high_cut_hz=16600, ceiling=0.85):
    """The ports hear it out of step and unequally loud; deep bass and top are cut, peaks rounded."""
    hz = bins(N)
    right_port = np.exp(-1j * at_hz(PORT_PHASE, hz)) * from_db(-at_hz(PORT_BALANCE, hz))
    heard = np.array([dry[0], irfft(rfft(dry[1]) * right_port, N)])
    heard = signal.sosfilt(signal.butter(6, low_cut_hz, "high", fs=SR, output="sos"), heard)
    heard = heard / (1 + (heard / ceiling) ** 6) ** (1 / 6)
    return signal.sosfilt(signal.ellip(10, .1, 90, high_cut_hz, fs=SR, output="sos"), heard)

dry = scene()
out = record(dry)
put_to_file(out)
```